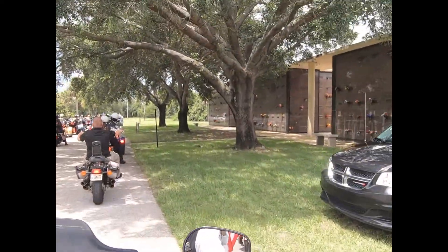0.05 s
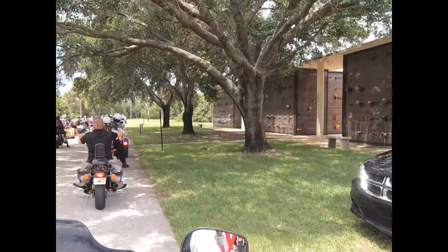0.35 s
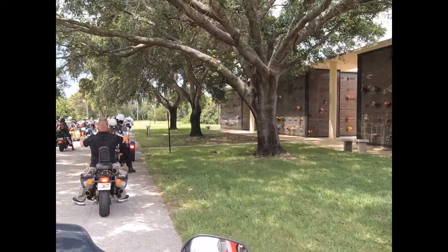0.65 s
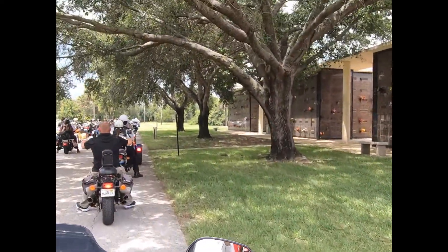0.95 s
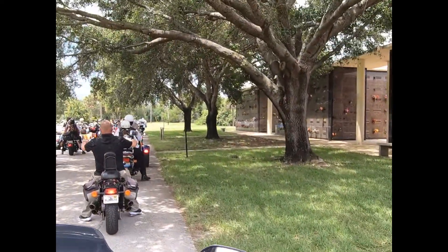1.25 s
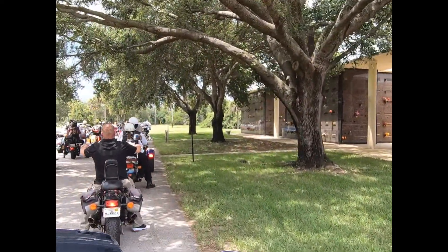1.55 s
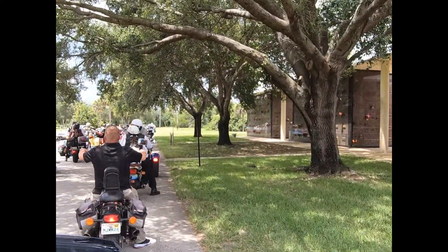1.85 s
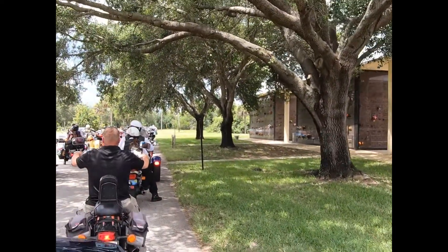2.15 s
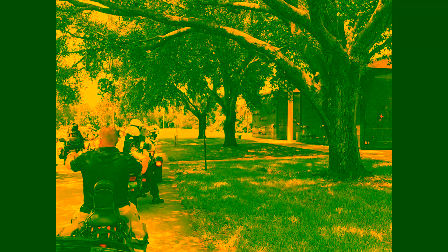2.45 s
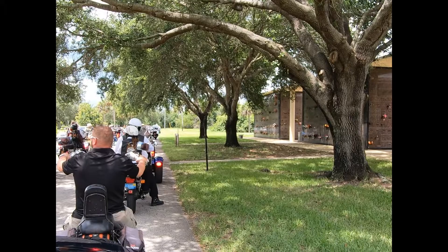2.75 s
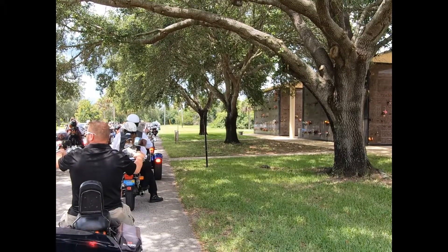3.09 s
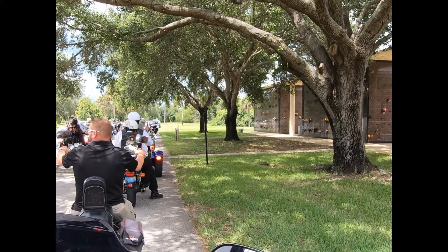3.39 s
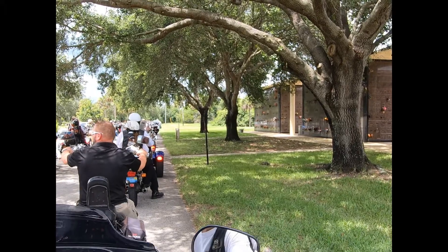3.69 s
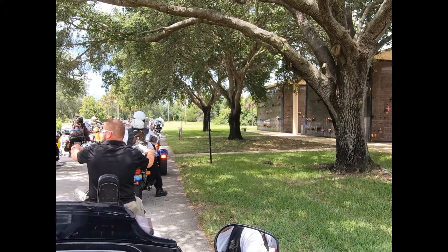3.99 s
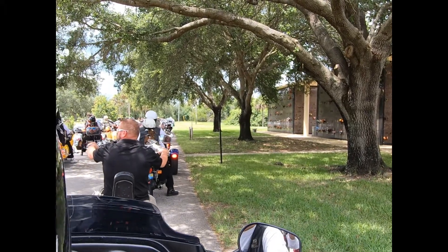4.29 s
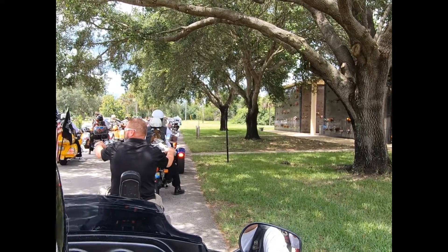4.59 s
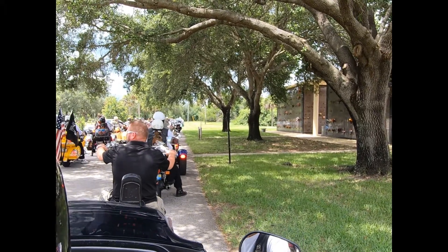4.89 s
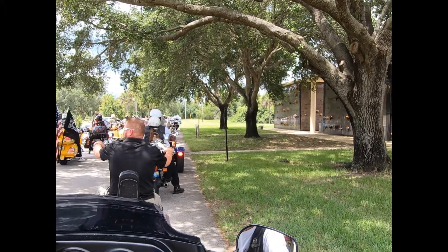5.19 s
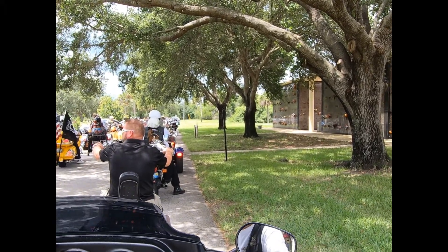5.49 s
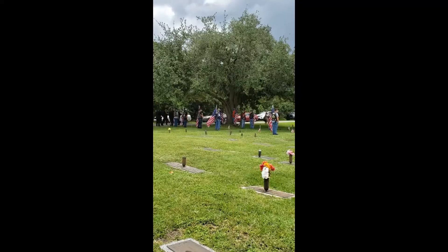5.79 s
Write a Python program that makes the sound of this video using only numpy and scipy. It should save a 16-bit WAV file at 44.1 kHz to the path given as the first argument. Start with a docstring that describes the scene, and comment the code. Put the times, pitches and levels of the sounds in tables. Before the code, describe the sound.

Deep, steady motorcycle exhaust rumble with ticking and knocking, heard from the seat, cuts to a quiet far-off rumble with soft thuds.

```python
"""A V-twin motorcycle throbs along in a slow procession, heard from its seat through a peak limiter.
Each firing sends a push of gas that rings the exhaust pipe. The bike just ahead, a loping neighbour
and the column beyond throb at their own speeds. Valves tick as the bike ahead drops to idle, engines
clatter and knock, tyres hiss and a brake sings faintly. After a short silence the column is heard
from far across a lawn, with a few soft thuds."""
import sys
import numpy as np
from scipy import signal
from scipy.fft import rfft, irfft
from scipy.io import wavfile
from scipy.ndimage import uniform_filter1d, minimum_filter1d

SR = 44100
rng = np.random.default_rng(int(sys.argv[2]) if len(sys.argv) > 2 else 0)


def generate_wav(sig):
    """Save sig (samples, or channels by samples) to the path in sys.argv[1] as 16-bit PCM at SR."""
    pcm = np.round(np.clip(np.atleast_2d(sig).T, -1, 1) * 32767).astype(np.int16)
    wavfile.write(sys.argv[1], SR, pcm)


N = 266364
TIME, HZ = np.arange(N) / SR, np.fft.rfftfreq(N, 1 / SR)
RIDE_END_S, LAWN_START_S = 5.567, 5.619


# our engine's speed in four-stroke cycles a second (t/s, speed/Hz)
OWN_SPEED = [(0, 10.62), (.7, 10.53), (1.2, 10.38), (1.8, 10.58), (2.4, 10.5), (3.2, 10.58), (4, 10.52),
             (4.4, 10.58), (4.75, 10.42), (5.5, 10.56)]
# how loud our exhaust is (t/s, level/dB)
OWN_DB = [(0, -25), (1.3, -26.5), (1.8, -23), (3.2, -18), (4.2, -21), (5.5, -21)]
# our silencer's short, hollow bark (f/Hz, level/dB)
OWN_PIPE = [(20, -31.5), (42, -20.5), (63, -12), (84, -3.5), (105, -10), (126, 0.5), (147, 1.5), (190, -6),
            (215, -6), (260, -19), (320, -26.5), (380, -32), (600, -41), (1000, -43.5), (1300, -61),
            (2200, -120)]
OWN_START = .012  # first firing, as a share of a cycle

def own_bike():
    """Our two cylinders fire almost evenly into the silencer. Gives the sound and the firings."""
    fire = firings(curve(OWN_SPEED), OWN_START, lag=.497, uneven_db=1)
    bark = exhaust(fire, band(OWN_PIPE) + body_db(), gas=.22, gas_s=.012)
    return gain_of(curve(OWN_DB)) * bark, fire


def firings(speed, start, lag, uneven_db, jitter_s=.0002):
    """One kick per cylinder per cycle, the second `lag` of a cycle later; no two burns are alike."""
    cycles, out = np.cumsum(speed) / SR - start, np.zeros(N)
    for offset in (0, lag):
        at = np.flatnonzero(np.diff(np.floor(cycles - offset)))
        late, size = rng.standard_normal((128, 2))[:len(at)].T
        at = np.clip(at + (late * jitter_s * SR).astype(int), 0, N - 1)
        out[at] += gain_of(uneven_db * size)
    return out


def exhaust(fire, pipe_db, gas, gas_s):
    """Each firing is a jump in pressure and a gust of swirling gas; both ring the pipe."""
    gust = np.sqrt(fade(fire ** 2, gas_s)) * rng.standard_normal(N)
    return evened(ring(gas * evened(gust) - evened(fire), pipe_db))


# the notes at which our bike's body rings (f/Hz, width/Hz, boost/dB)
BODY = [(56.5, 7.5, 3), (141.1, 17.3, 2.5), (313.4, 14, 10), (608, 60, 3.5)]

def body_db():
    """The bike's body boosts any sound near its own notes."""
    return sum(db / (1 + (2 * (HZ - hz) / width) ** 2) for hz, width, db in BODY)


# the bike ahead rolls, then drops to idle (t/s, speed/Hz)
AHEAD_SPEED = [(0, 10.45), (1.6, 10.45), (1.8, 8.22), (2.9, 8.02), (3.25, 7.51), (3.7, 7.58), (4.2, 8.01),
               (4.6, 7.78), (4.72, 8.52), (4.95, 8.77), (5.5, 8.81)]
# how loud its exhaust is (t/s, level/dB)
AHEAD_DB = [(0, -20), (1.4, -22.5), (2.1, -26.5), (3, -17), (3.6, -21.5), (4.4, -19.5), (5.5, -19.5)]
# the ring of its pipes, and of the column's (f/Hz, level/dB)
PIPE = [(13, -36.5), (24, -28.5), (33, -10), (42, -9), (59, 1.5), (129, -3), (203, -12), (283, -17.5),
        (317, -21), (378, -29), (554, -40), (610, -29), (671, -40), (1000, -39.5), (1300, -58.5),
        (2200, -120)]
AHEAD_START = .456  # first firing, as a share of a cycle

def bike_ahead():
    """Its pipes point back at us, so we hear more bark than boom. Gives the sound and the firings."""
    fire = firings(curve(AHEAD_SPEED), AHEAD_START, lag=.42, uneven_db=1.2)
    facing_db = read([(40, -10.5), (77, 1.5), (95, 10), (110, -.5), (128, 4), (160, 1.5), (200, -2.5),
                      (300, -2), (600, .5)], HZ)
    bark = exhaust(fire, band(PIPE) + facing_db, gas=.35, gas_s=.0073)
    return gain_of(curve(AHEAD_DB)) * bark, fire


# how loud the neighbour is (t/s, level/dB)
NEIGHBOUR_DB = [(0, -27.5), (1.5, -22), (3, -19.5), (5.5, -21.5)]
# the thump of its open pipes (f/Hz, level/dB)
NEIGHBOUR_PIPE = [(15, -28.5), (42, -15.5), (59, 3.5), (76, -5.5), (93, 3), (125, -0.5), (160, -2),
                  (210, -9), (270, -12), (400, -30.5), (1000, -41), (2200, -120)]

def neighbour(idle_hz=8.42):
    """A bike idles nearby, loping: a short gap between firings, then a long one."""
    fire = firings(idle_hz * (1 + .005 * drift(.6)), start=.3, lag=.29, uneven_db=1.2)
    thump = exhaust(fire, band(NEIGHBOUR_PIPE) + body_db(), gas=.22, gas_s=.01)
    return gain_of(curve(NEIGHBOUR_DB)) * thump


# the bikes further up the column (speed/Hz, relative level/dB)
COLUMN = [(8.2, -31.5), (9.65, -28), (11.3, -30), (12.7, -31), (7.4, -28.5)]

def column():
    """Five wandering engines blur into one echoing rumble. Gives the sound and the firings."""
    fire = np.zeros(N)
    for rate, db in COLUMN:
        speed = rate * (1 + .02 * drift(.6))
        fire += gain_of(db) * firings(speed, rng.random(), lag=.43, uneven_db=2, jitter_s=.0003)
    distance_db = read([(35, -9), (48, 0), (59, 5), (70, -1.5), (95, 1), (120, -1), (150, -2.5),
                        (200, 0), (300, -4.5), (470, 4), (800, -7)], HZ)
    rumble = exhaust(fire, band(PIPE) + distance_db + .5 * body_db(), gas=.31, gas_s=.011)
    return gain_of(-15.5) * outdoors(rumble, t60=.55, wet=.85), fire


# the two valves ahead (offset/dB, ring f/Hz, scatter/Hz, dB lost per Hz of speed above idle)
VALVES = [(3.5, 3720, 450, 2), (1.5, 2600, 170, 7.5)]
# their ticks grow as that bike comes near (t/s, base level/dB)
TICK_DB = [(0, -44.5), (1.7, -42), (2.5, -40.5), (3.3, -36), (4.5, -38), (5.5, -34.5)]
# the valve closings that stand out (t/s, level/dB, ring f/Hz)
HARD_TICKS = [(.3511, -36, 3290), (.8894, -38, 3010), (.9837, -35.5, 4300), (1.2062, -37, 3210),
              (1.3673, -34, 3680), (1.6511, -36, 3970), (2.1226, -36.5, 3350), (2.3445, -35, 4960),
              (2.5915, -36.5, 4470), (2.9656, -33.5, 3830), (3.0928, -30.5, 4100), (3.2245, -32, 4400),
              (3.3572, -28.3, 4060), (3.4146, -33.5, 3330), (3.4904, -33, 4670), (3.5458, -30.5, 3870),
              (3.6206, -29.5, 3960), (3.7538, -32, 3750), (3.8831, -31.5, 3800), (4.0665, -31, 3300),
              (4.139, -33, 4270), (4.2642, -29.3, 4370), (4.3166, -30, 3050), (4.3894, -31, 3670),
              (4.4438, -32, 2950), (4.5176, -30, 3900), (4.5715, -31, 2850), (4.6448, -31.5, 3620),
              (4.9806, -34.5, 3470), (5.1801, -34.5, 3600), (5.221, -28, 3190), (5.2844, -35.5, 3170)]

def valves(idle_hz=7.6, uneven_db=.9):
    """Each valve ahead ticks shut once a cycle; one of them is loose only at slow idle."""
    out = np.zeros((2, N))
    level_db, above_idle = curve(TICK_DB), curve(AHEAD_SPEED) - idle_hz
    for phase, (db, ring_hz, scatter_hz, lost_db) in zip((.585, .01), VALVES):
        for s in beats(AHEAD_SPEED, AHEAD_START + phase, skip=HARD_TICKS):
            force, pitch = rng.standard_normal(2)
            at = round(s * SR)
            peak_db = level_db[at] + db - lost_db * above_idle[at] + uneven_db * force
            add(out, s, gain_of(peak_db) * tick(ring_hz + scatter_hz * pitch))
    for s, db, ring_hz in HARD_TICKS:
        add(out, s, gain_of(db) * tick(ring_hz))
    return out


# the ring of a rocker box, the metal cover over the valves (f/Hz, level/dB)
ROCKER_BOX = [(900, -25), (2300, -15), (3000, -1), (3700, -1.5), (4500, -2.5), (5200, -6), (5850, -2),
              (6400, -16), (8600, -27.5), (9700, -21), (11000, -33), (14000, -31)]

def tick(ring_hz, boost_db=8, half_width_hz=470):
    """One valve closes and the rocker box rings, boosted near one note."""
    hz = np.fft.rfftfreq(2048, 1 / SR)
    colour_db = band(ROCKER_BOX, hz) + boost_db / (1 + ((hz - ring_hz) / half_width_hz) ** 2)
    return clack(colour_db, rise_s=.0003, decay_s=.0037, width=.31)


def clack(colour_db, rise_s, decay_s, width):
    """A burst of tiny metal contacts rings the part that they hit."""
    t = np.arange(2048) / SR
    contacts = rng.standard_normal((2, len(t))) * (1 - np.exp(-t / rise_s)) * np.exp(-t / decay_s)
    mid, side = ring(contacts, colour_db)
    loudest = np.sqrt(uniform_filter1d(mid ** 2, 88).max())
    return spread(mid, width * side) / loudest


# the regular knocking grows (t/s, base level/dB)
SLACK_DB = [(0, -45), (2, -41), (2.6, -37), (3.7, -34.5), (5.5, -35.5)]
# the knocks that stand out (t/s, level/dB)
HARD_KNOCKS = [(3.2419, -35), (3.4325, -35), (3.5263, -33), (3.6216, -34), (3.8111, -32), (4.0017, -34),
               (4.3793, -33), (4.5704, -35), (4.7605, -31.5), (4.8557, -33), (4.9525, -35), (5.1445, -28),
               (5.5277, -31.5)]
# the ring of the drive-train case (f/Hz, level/dB)
CASE = [(500, -15), (900, -6), (1200, 4), (1450, -10), (2500, -20), (5000, -28)]

def knocks(uneven_db=.8, hum_db=-3):
    """Our drive train takes up its slack after each firing, harder for the front cylinder."""
    out, t, hz = np.zeros((2, N)), np.arange(2048) / SR, np.fft.rfftfreq(2048, 1 / SR)
    # each knock also sets the body humming on its two upper notes
    hum = sum(np.sin(2 * np.pi * f * t) * np.exp(-np.pi * width * t) for f, width, _ in BODY[2:])
    hum *= gain_of(hum_db) * (1 - t / t[-1])
    regular = []
    for phase, cylinder_db in ((.109, -1), (.613, -5)):
        for s in beats(OWN_SPEED, OWN_START + phase, skip=HARD_KNOCKS):
            regular.append((s, curve(SLACK_DB, s) + cylinder_db + uneven_db * rng.standard_normal()))
    for s, db in regular + HARD_KNOCKS:
        case_db = band(CASE, hz * (1 + .05 * rng.standard_normal()))  # each knock lands differently
        add(out, s, gain_of(db) * (clack(case_db, rise_s=.00067, decay_s=.0035, width=.34) + hum))
    return out


# the tone of the engines' clatter, before shading (f/Hz, level/dB)
CLATTER = [(220, -11.5), (380, 2), (556, -3.5), (614, -5.5), (849, -11.5), (1210, -12), (1390, -15),
           (2060, -16), (2210, -17), (2510, -17.5), (3730, -18), (5620, -26.5), (6940, -31.5), (10000, -41),
           (11000, -43.5), (14400, -64), (22000, -120)]
# how loud it is (t/s, base level/dB)
CLATTER_DB = [(0, -38.5), (.45, -38), (.7, -37.5), (1.05, -38.5), (1.4, -37), (2.1, -37.5), (3, -38),
              (3.7, -37.5), (4.5, -37.5), (5.5, -36.5)]
# exhausts rasp under load, lifting its lowest band (t/s, boost/dB)
RASP_DB = [(0, 2.5), (.7, 3), (.9, 0), (2.1, 2.5), (2.9, 2), (3.3, 2), (4.5, 0), (5.5, -1)]

def clatter(shake, delay_s=.012, taps_per_s=160):
    """Chains and gears rattle just after every firing; each pitch band has its own stray taps."""
    bursts = fade(np.roll(shake, round(delay_s * SR)) ** 2, .0034)
    shading_db = read([(400, -3), (900, 1), (2500, .5), (4000, -3.5), (7000, -5.5), (11000, -3.5)], HZ)
    noise = rfft(wide_noise(band(CLATTER) + shading_db))
    edges_hz, out = (0, 850, 1700, 3200, 6200, SR), np.zeros((2, N))
    for low, high in zip(edges_hz, edges_hz[1:]):
        hits = (rng.random(N) < taps_per_s / SR) * rng.exponential(1, N)
        taps = fade(hits ** 2, .0024)
        power = .7 + .41 * bursts / bursts.mean() + .045 * taps / taps.mean()
        load_db = curve(RASP_DB) if low == 0 else 0
        out += gain_of(load_db) * np.sqrt(power) * irfft(noise * ((HZ >= low) & (HZ < high)), N)
    return gain_of(curve(CLATTER_DB)) * out


# light ticks from the bikes further ahead (t/s, level/dB)
STRAY_DB = [(0, -42), (1.3, -40), (2.3, -41), (3, -45), (4.5, -44), (5.5, -41.5)]

def stray_ticks(count=130, ring_hz=(2800, 6100), uneven_db=1.5):
    """The valves of other bikes, in step with nothing near, make a fine rattle."""
    out = np.zeros((2, N))
    for when, pitch, force in rng.random((count, 3)):
        s = when * RIDE_END_S
        db = curve(STRAY_DB, s) + uneven_db * (2 * force - 1)
        add(out, s, gain_of(db) * tick(np.interp(pitch, (0, 1), ring_hz)))
    return out


# light clinks of tappets and other small parts (t/s, level/dB)
CLINKS_DB = [(0, -52), (1.3, -47), (2.8, -54), (5.5, -54)]

def clinks(count=5000):
    """Small metal parts are shaken, each ringing briefly on its own note."""
    t, out = np.arange(1024) / SR, np.zeros((2, N))
    shape = np.exp(-t / .002) * (1 - np.exp(-t / .0004))
    for when, pitch, size, direction in rng.random((count, 4)):
        hz = 1800 + 2300 * pitch
        lead = (direction - .5) * np.array([[1], [-1]]) * np.pi / 2  # one side's wave comes earlier
        add(out, when * N / SR, size * shape * np.sin(2 * np.pi * hz * t + lead))
    return gain_of(curve(CLINKS_DB)) * evened(out)


# each squeeze of a brake (t/s, length/s, f/Hz, level/dB)
SQUEEZES = [(2.32, .24, 2219, -48), (2.36, .23, 2182, -55), (2.54, .3, 2221, -51.3),
            (3.04, .25, 2225, -50.5), (3.32, .49, 2230, -52.5), (3.82, .18, 2175, -54),
            (4.31, .18, 2485, -55.5), (4.49, .19, 2225, -51.5), (4.795, .23, 2227, -50.5),
            (4.99, .27, 2087, -53)]

def brake(drag_hz=2163, drag_db=-65, attack_s=.026, release_s=.085):
    """Brake discs sing a different wavering note at each squeeze, and barely drag in between."""
    def note(hz):
        wavering_hz = hz * (1 + .003 * drift(70))
        return evened(np.sin(2 * np.pi * np.cumsum(wavering_hz) / SR))
    song = gain_of(drag_db) * note(drag_hz)
    for s, length, hz, db in SQUEEZES:
        grip = np.clip(np.minimum((TIME - s) / attack_s, (s + length - TIME) / release_s), 0, 1)
        song += gain_of(db) * grip * note(hz)
    return spread(song * gain_of(1.4 * drift(18)), 0)


# brief midrange rattles and rasps, and a few high squeaks (t/s, length/s, f/Hz, width/Hz, level/dB)
RATTLES = [(0.52, 0.34, 2030, 398, -48.5), (0.892, 0.039, 2140, 300, -42), (1.11, 0.29, 2750, 497, -49.5),
           (1.46, 0.41, 5030, 990, -53), (1.678, 0.15, 5140, 800, -49), (2.32, 0.28, 2580, 597, -50),
           (3.45, 0.58, 1005, 350, -46.5), (5.33, .14, 2140, 398, -47.5), (5.356, 0.13, 7770, 804, -51.5)]

def noise_swells(rows):
    """Short swells of noise, each gathered around one note."""
    out = np.zeros((2, N))
    for s, length, hz, width, db in rows:
        count = round(length * SR)
        resonance = 1 / (1 + (2 * (np.fft.rfftfreq(count, 1 / SR) - hz) / width) ** 2)
        mid, side = evened(irfft(rfft(rng.standard_normal((2, count))) * resonance, count))
        add(out, s, gain_of(db) * spread(mid, .67 * side) * np.sqrt(np.hanning(count)))
    return out


# the tone of tyres and soles on the pavement (f/Hz, level/dB)
HISS = [(2500, -27.5), (4200, -1), (5200, 0), (6600, -2.5), (8200, -5), (10300, -7.5), (11400, -23.5),
        (14000, -25.5)]
# tyre hiss, strongest while the bike rolls up (t/s, level/dB)
HISS_DB = [(0, -57), (1, -55), (1.7, -50.5), (2.6, -54), (4.8, -55), (5.5, -51.5)]
# soles scuffing (middle t/s, length/s, level/dB)
SCUFFS = [(.05, 0.023, -46.5), (1.74, 0.073, -46), (4.99, 0.033, -50), (5.08, 0.089, -46.5)]

def hiss():
    """Tyres and soles rub over the pavement."""
    level = np.hypot(gain_of(curve(HISS_DB)), swells(SCUFFS))
    return level * gain_of(.5 * drift(30)) * wide_noise(band(HISS))


# the column's rumble from afar (f/Hz, level/dB)
FAR_RUMBLE = [(15, -43), (25, -22), (54, -1.5), (75, -1), (118, -11), (150, -14), (179, -16.5), (331, -35),
              (500, -42), (650, -47), (1100, -120)]
# soft low thuds, like footsteps or a hand bumping the microphone (t/s, level/dB)
THUDS = [(5.657, -31), (5.832, -32), (5.966, -31)]
# open air over the lawn (f/Hz, level/dB)
AIR = [(180, 0), (300, -11.5), (540, -9), (850, -7), (973, -14), (1220, -12), (1890, -20.5), (2930, -17.5),
       (3510, -24.5), (3960, -23), (8810, -32.5), (10400, -47), (11000, -38.5), (14400, -38), (22000, -120)]
# faint rustles and chirps there (t/s, length/s, f/Hz, width/Hz, level/dB)
RUSTLES = [(5.643, .034, 2980, 150, -55.5), (5.645, .028, 520, 140, -46), (5.808, .04, 2960, 190, -56),
           (5.86, .11, 1700, 60, -61)]

def far_column(rumble_db=-32, air_db=-47.5, thud_s=.05):
    """From across the lawn one hears a low rumble, soft thuds, the air and a few rustles."""
    fire = sum(firings(np.full(N, rate), rng.random(), lag=.43, uneven_db=1.5, jitter_s=.001)
               for rate, _ in COLUMN)
    rumble = outdoors(exhaust(fire, band(FAR_RUMBLE), gas=.94, gas_s=.016), t60=.26, wet=.94)
    thuds = swells([(s, thud_s, db) for s, db in THUDS]) * rumble  # they borrow the rumble's low tone
    air = gain_of(air_db) * wide_noise(band(AIR))
    return gain_of(rumble_db) * rumble + thuds + air + noise_swells(RUSTLES)


def outdoors(x, t60, wet):
    """Ground, trees and a wall scatter back a short echo that falls 60 dB in t60 seconds."""
    t = np.arange(SR // 2) / SR
    tail = rng.standard_normal(len(t)) * gain_of(-60 * t / t60) * (t > .012)
    return evened(x + wet * signal.fftconvolve(x, tail / np.linalg.norm(tail))[:N])


# how wide the noises sound (f/Hz, side level against the middle/dB)
WIDTH = [(60, -43), (110, -15), (190, 11.5), (340, -25.5), (600, -6.5), (1060, -6), (1890, -4), (3360, -8),
         (5970, 1), (10600, 2.5)]

def wide_noise(db):
    """Stereo noise with the given tone, nearly mono in the deep bass."""
    mid, side = rfft(rng.standard_normal((2, N))) * gain_of(db)
    mid, side = irfft(mid, N), irfft(side * gain_of(read(WIDTH, HZ)), N)
    return spread(mid, side) / mid.std()


def gain_of(db):
    """Decibels to amplitude."""
    return 10 ** (np.asarray(db) / 20)


def evened(x):
    """Scales to an average (rms) level of 1."""
    return x / np.sqrt(np.mean(x ** 2) + 1e-20)


def curve(rows, t=TIME):
    """Joins rows of (t/s, value) with straight lines."""
    return np.interp(t, *np.transpose(rows))


def read(points, hz):
    """Joins rows of (f/Hz, value) along a pitch scale."""
    f, value = np.transpose(points)
    return np.interp(np.log(hz + 1), np.log(f + 1), value)


def band(points, hz=HZ):
    """A tone shape in dB that falls 24 dB an octave beyond its ends."""
    below = np.maximum(np.log2(points[0][0] / (hz + 1)), 0)
    above = np.maximum(np.log2((hz + 1) / points[-1][0]), 0)
    return read(points, hz) - 24 * (below + above)


def ring(x, db):
    """Filters so that a blow rings after it lands, never before (minimum phase)."""
    log_gain = np.log(gain_of(np.maximum(db, -100)))
    mirrored = np.concatenate([log_gain, log_gain[-2:0:-1]])
    response = np.exp(np.conj(signal.hilbert(mirrored)))[:len(db)]
    return irfft(rfft(x) * response, x.shape[-1])


def drift(top_hz):
    """A random wobble of average size 1, no faster than top_hz."""
    rates = top_hz * rng.uniform(.1, 1, 12)
    wobble = sum(np.sin(2 * np.pi * (f * TIME[::100] + rng.random())) for f in rates)
    return evened(wobble).repeat(100)[:N]


def fade(x, seconds):
    """Gives each kick a dying tail."""
    return signal.lfilter([1], [1, -np.exp(-1 / (seconds * SR))], x)


def swells(rows):
    """Smooth humps from rows of (middle t/s, length/s, level/dB)."""
    return sum(gain_of(db) * np.cos(np.pi * np.clip((TIME - s) / length, -.5, .5))
               for s, length, db in rows)


def beats(speed, phase, skip):
    """The times when an engine passes one point of its cycle, except near the events in `skip`."""
    cycles = np.cumsum(curve(speed)) / SR - phase
    times = TIME[np.flatnonzero(np.diff(np.floor(cycles)))]
    return [s for s in times if all(abs(s - row[0]) > .01 for row in skip)]


def spread(mid, side):
    """Left and right from a middle and a side signal."""
    return np.array([mid + side, mid - side])


def add(mix, s, sound):
    """Mixes a stereo sound in at time s."""
    part = mix[:, max(round(s * SR), 0):][:, :sound.shape[1]]
    part += sound[:, :part.shape[1]]


def scene():
    """The ride, a moment of silence, then the column from across the lawn."""
    own, own_fire = own_bike()
    ahead, ahead_fire = bike_ahead()
    others, column_fire = column()
    shake = evened(own_fire) + .38 * evened(ahead_fire) + 3.5 * evened(column_fire)
    ride = own + ahead + neighbour() + others + valves() + knocks() + clatter(shake)
    ride += stray_ticks() + clinks() + brake() + noise_swells(RATTLES) + hiss()
    fade_out = np.clip((RIDE_END_S - TIME) / .002, 0, 1)
    fade_in = np.clip((TIME - LAWN_START_S) / .032, 0, 1) ** 2
    return ride * fade_out + far_column() * fade_in


# how far the left microphone's wave leads the right's (f/Hz, phase/radians)
MIC_PHASE = [(25, .3), (60, 0.15), (125, 0.13), (250, 0), (700, 0), (1200, .35), (2500, -.1), (4000, 0),
             (5700, .6), (11000, .8)]
# how much louder the left one is (f/Hz, level/dB)
MIC_BALANCE = [(60, 0), (340, -.3), (600, -0.7), (1060, -.7), (1890, 2.5), (3360, 2.5), (5970, -3),
               (10600, 0.5)]

def record(dry):
    """Two slightly unlike microphones feed a limiter that turns peaks down: bass fully, treble partly."""
    crossover_hz, top_hz = 450, 14500
    ceiling, hold_samples = .45, 900
    treble_share, treble_db = .55, -1
    left = gain_of(read(MIC_BALANCE, HZ) / 2) * np.exp(.5j * read(MIC_PHASE, HZ))
    spectrum = rfft(dry) * np.array([left, 1 / left])
    full = irfft(spectrum, N)
    bass = irfft(spectrum / (1 + (HZ / crossover_hz) ** 4), N)
    allowed = np.minimum(1, ceiling / (abs(full).max(0) + 1e-9))
    duck = uniform_filter1d(minimum_filter1d(allowed, hold_samples), hold_samples)  # dips before a peak
    limited = bass * duck + (full - bass) * duck ** treble_share * gain_of(treble_db)
    lowpass = signal.firwin(511, top_hz, window=("kaiser", 9), fs=SR)
    return signal.oaconvolve(limited, lowpass[None], "same")


dry = scene()
out = record(dry)
generate_wav(out)
```